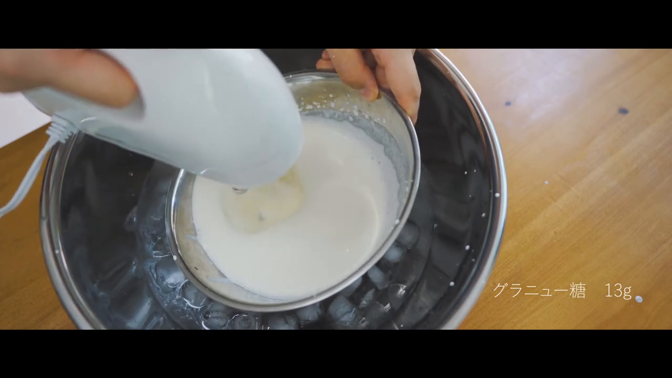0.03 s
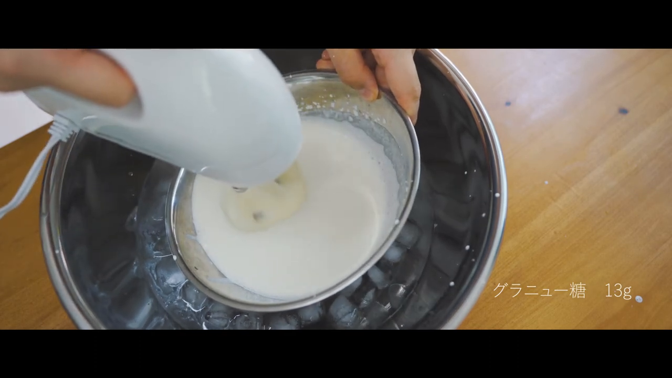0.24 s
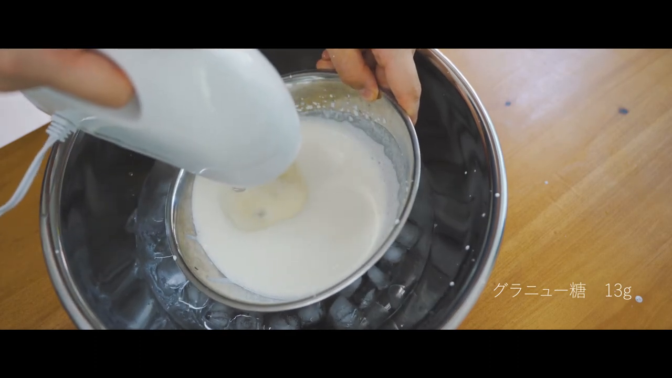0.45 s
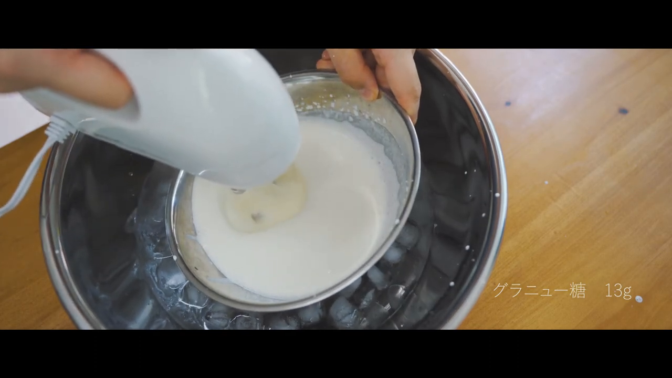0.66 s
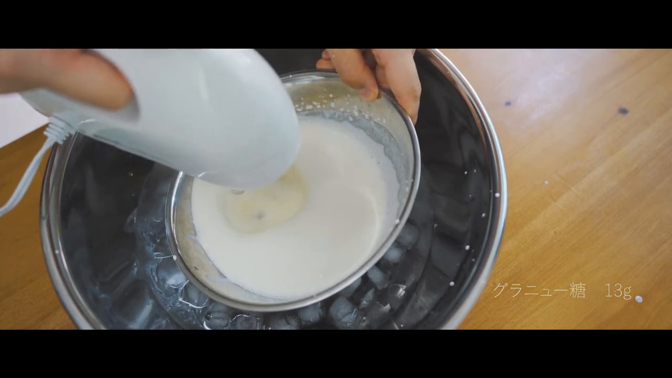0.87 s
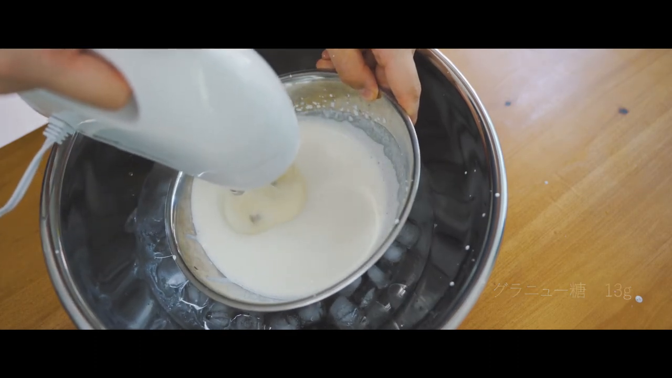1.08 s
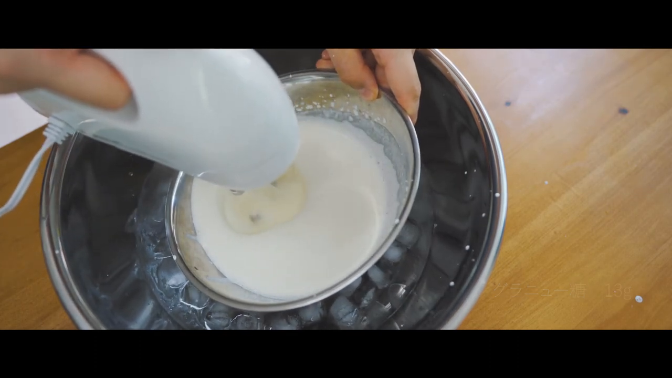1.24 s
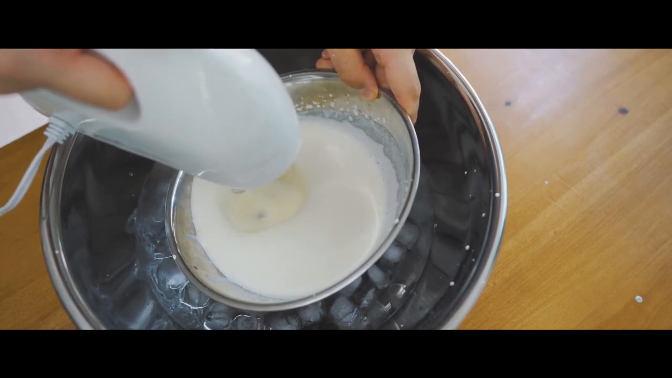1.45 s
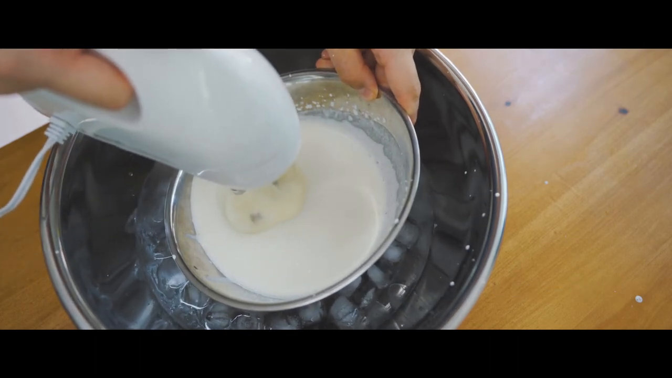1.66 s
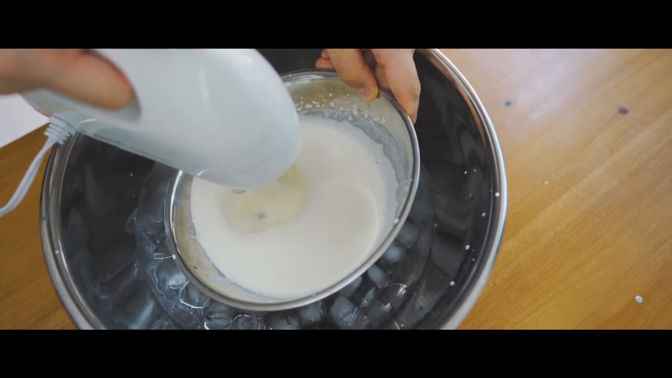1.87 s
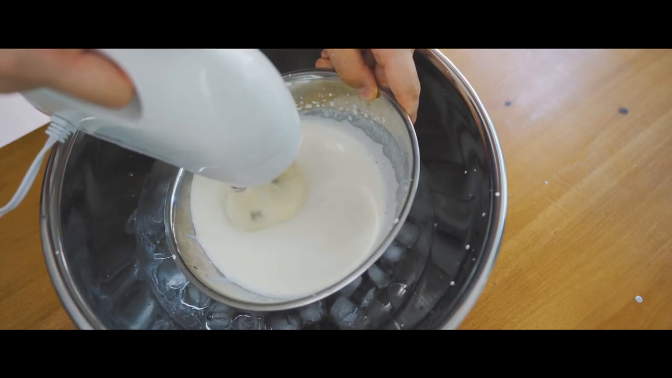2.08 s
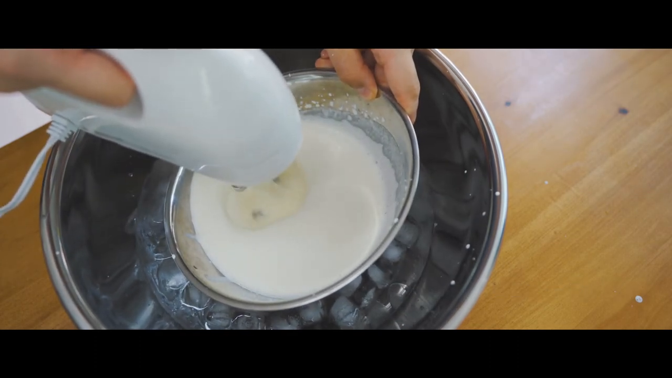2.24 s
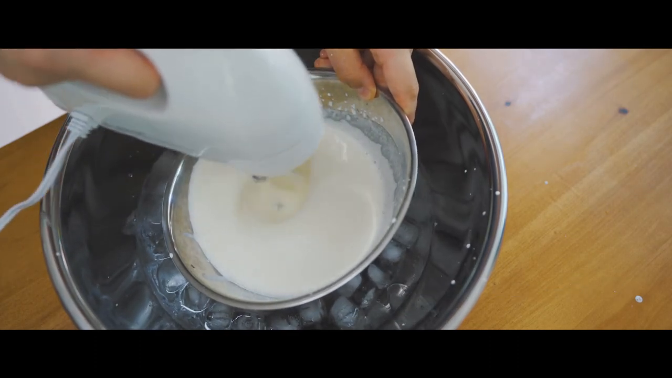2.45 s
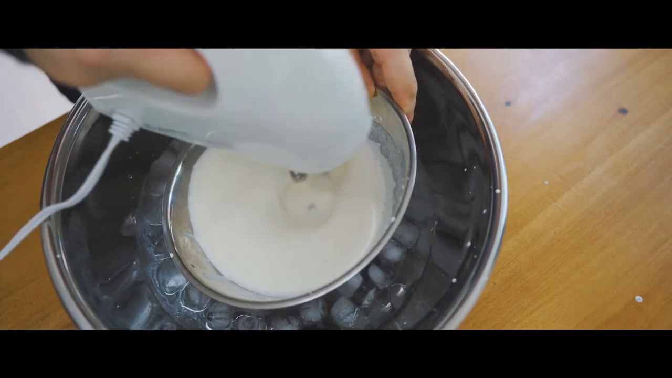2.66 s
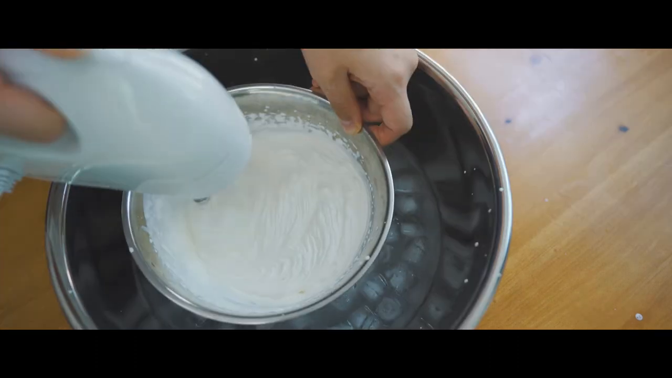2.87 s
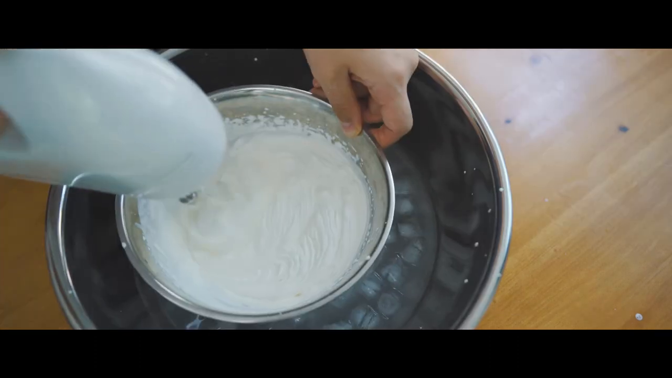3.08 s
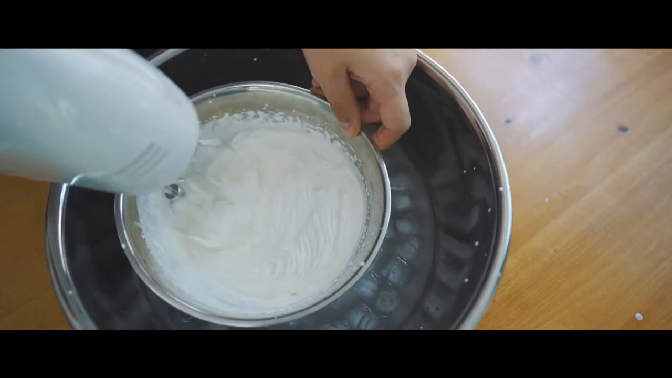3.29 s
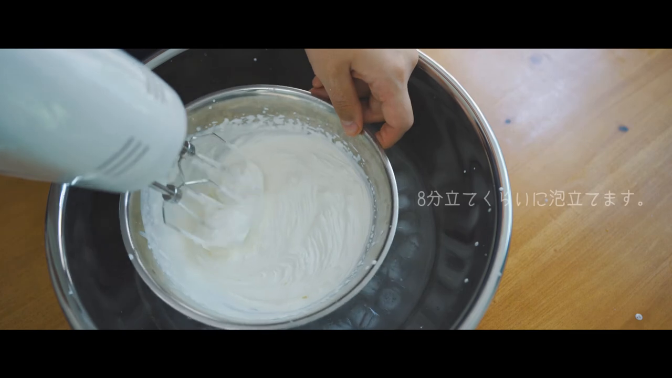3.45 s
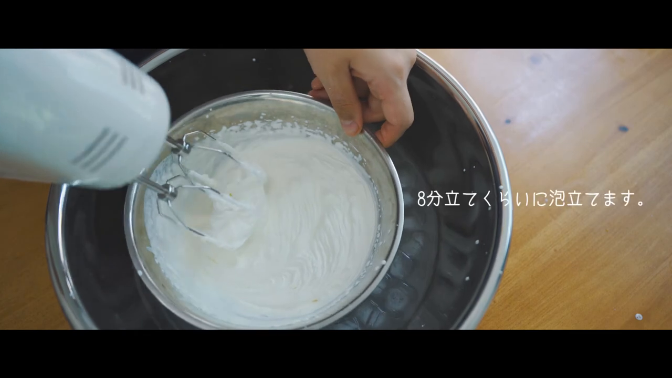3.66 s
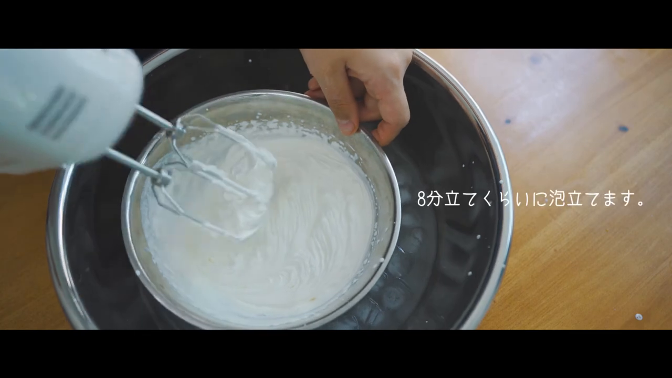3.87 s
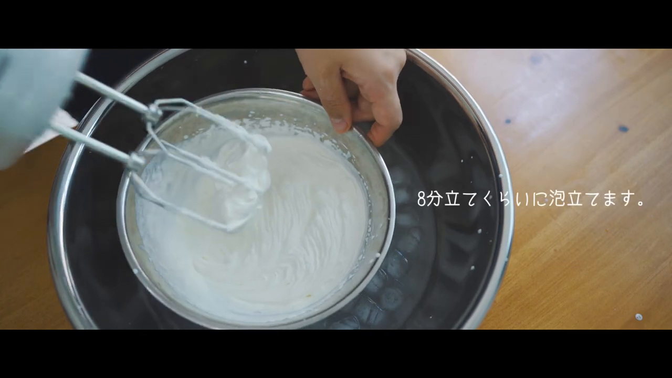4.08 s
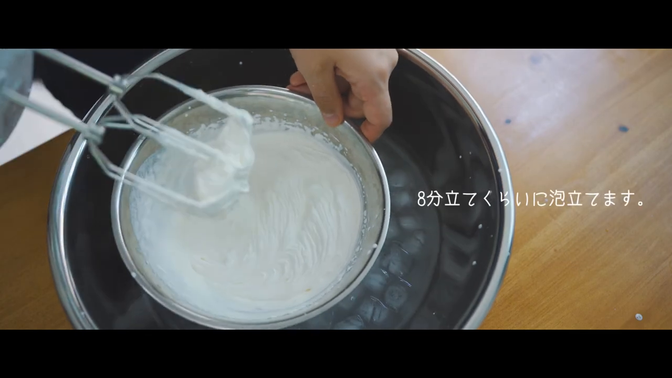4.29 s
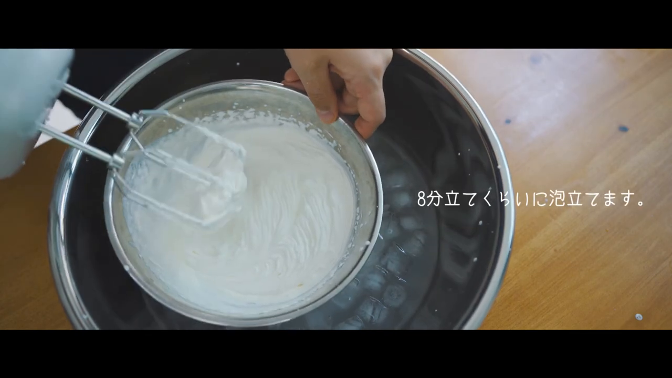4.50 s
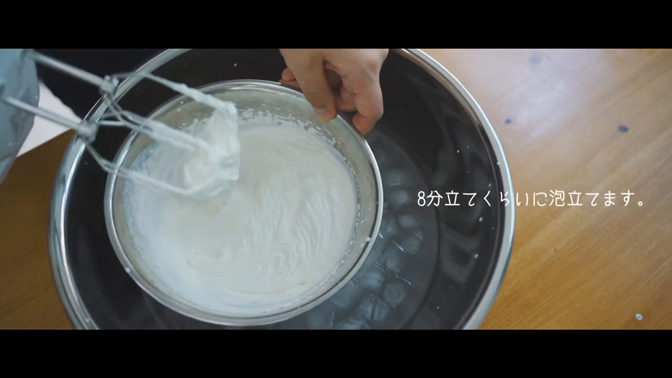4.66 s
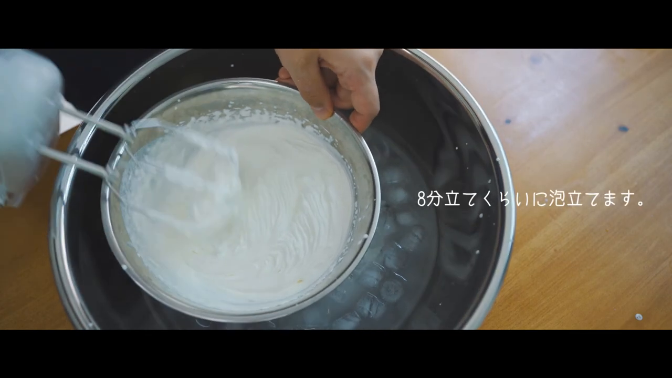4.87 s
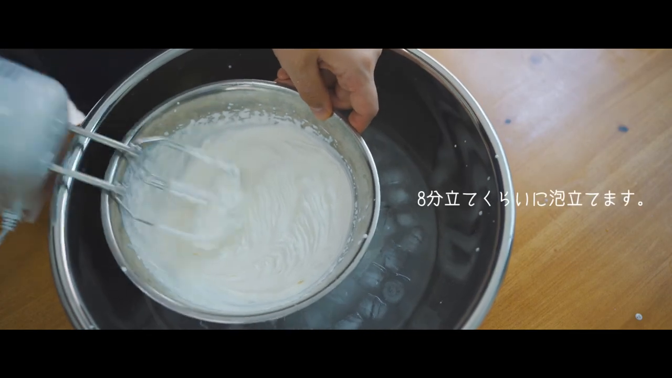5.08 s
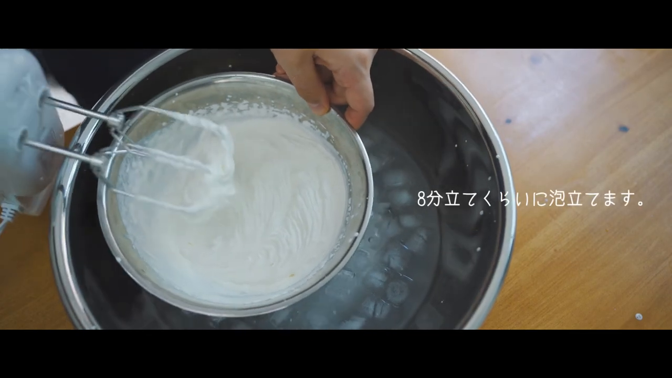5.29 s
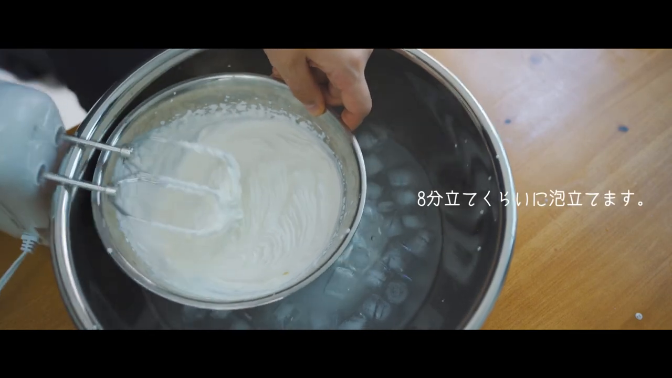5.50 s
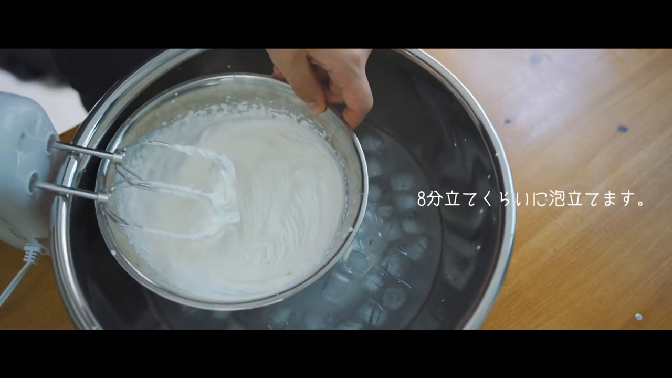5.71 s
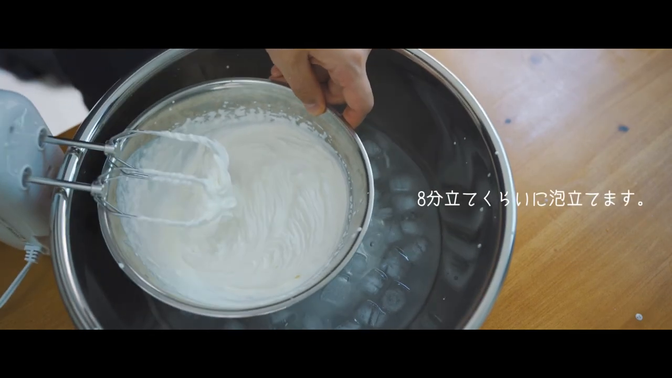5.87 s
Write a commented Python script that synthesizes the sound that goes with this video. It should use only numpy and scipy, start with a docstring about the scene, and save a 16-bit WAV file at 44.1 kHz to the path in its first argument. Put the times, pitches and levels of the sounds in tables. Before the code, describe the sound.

An electric hand mixer whips cream in a bowl, its motor whining steadily above a wet patter and gear rattle. After roughly three seconds it clicks off and spins down. Scattered light ticks and taps of the beaters follow, with a little dripping cream, then sharper knocks on glass and a short buzzing clang on a steel bowl. The sound is close, in a quiet kitchen with little echo.

```python
"""Whipping cream with a hand mixer

An electric mixer whips cream in a glass bowl that stands in a steel bowl of ice water. Its motor
whines and throbs with the mains over rattling gears and churning cream, then is switched off and coasts.
The lifted beaters tick in their sockets, drop cream and knock on the glass; the steel bowl rings."""
import sys
import numpy as np
from scipy import signal
from scipy.fft import rfft, irfft, next_fast_len
from scipy.io import wavfile

SR = 44100
rng = np.random.default_rng(int(sys.argv[2]) if len(sys.argv) > 2 else 0)


def dump(signal):
    """Clip the signal to [-1, 1] and save it as 16-bit WAV at the path in sys.argv[1]."""
    limited = np.clip(np.atleast_2d(signal).T, -1, 1)
    pcm = np.round(limited * 32767).astype(np.int16)
    wavfile.write(sys.argv[1], SR, pcm)


N = 261954
TIME = np.arange(N) / SR
OFF_S, MAINS_HZ = 2.87, 50  # when the whine cuts off; pitch of the mains power
TOP_SPEED, BAR_COUNT = 242.5, 12  # motor turns per second with no load; contact bars on the rotor

# Table levels are relative: the functions add their own gains. A ring time is the time to fade by 60 dB.
# motor speed lost to the thickening cream (time [s], loss [turns/s])
CREAM_DRAG = [(0, .1), (1.1, .4), (1.8, 1.9), (2.5, 2.5), (2.86, 1.6)]
# how hard the beaters work (time [s], level [dB])
LOAD = [(0.0, -28.5), (0.01, -30.5), (0.48, -36), (0.51, -33.5), (0.77, -37.5), (1.6, -36.5), (2.27, -38),
        (2.86, -34.5)]
# lowest tone of the whine (time [s], level [dB])
WHINE_LEVEL = [(0.0, -32), (0.17, -35.5), (0.4, -31), (0.64, -32.5), (0.68, -30), (2.55, -29.5),
               (2.76, -36.5), (2.79, -31), (2.86, -32.5)]
# how loud the whine's upper tones are (time [s], level of tones 2 to 4 [dB], level of tone 5 [dB])
WHINE_OVERTONE_LEVELS = [(0.0, -53, -52), (0.25, -44, -53), (0.79, -46.5, -59), (1.26, -42, -66),
                         (1.42, -40.5, -56), (2.17, -48.5, -62), (2.5, -45, -55), (2.6, -39.5, -58),
                         (2.86, -49.5, -50)]
# the whine's five tones (level [dB], left minus right [dB], left side's lead [rad], mains throb [0-1])
WHINE_TONES = [(3, .5, 1.12, 0.55), (-4.5, -4.5, 1.38, 0.52), (-10.5, -6.5, 0.61, 0.16), (-17, -2, .2, 0.1),
               (1.5, 0, 1.5, 0.1)]
# shaking of the unbalanced rotor and chatter of the brushes (multiple of motor speed [x], level [dB])
ROTOR_TONES = [(1, -59.5), (3, -56), (5, -64), (7, -57), (8, -49.5), (11, -49), (13, -53), (17, -58.5)]
BRUSH_TONES = [(51, -65), (53, -66), (54, -67), (57, -67), (61, -67)]
# hum of the motor's fixed coils (multiple of the mains [x], level [dB])
COIL_TONES = [(6, -64.5), (10, -62), (12, -45), (24, -55.5)]
# tone colours of the brushes with and without power, and of the gears (frequency [Hz], level [dB])
RASP_COLOUR = [(2500, -35), (2780, 0.5), (2930, -0.5), (3030, -4), (3250, -36.5)]
SLIDE_COLOUR = [(600, -56), (1500, -42), (2000, -41), (2400, -53), (3800, -49), (7000, -56), (8300, -51),
                (9500, -62), (12500, -55), (14000, -53), (16000, -60)]
GEAR_COLOUR = [(500, -25), (900, -8.5), (1200, -4.5), (1380, -9), (1600, -3), (1950, -0.5), (2180, -1),
               (2330, -9.5), (2500, 2), (2720, -10), (2930, -7), (3150, -10.5), (3700, -22), (6000, -31.5)]
# tone colours of churned, spraying and slapped cream (frequency [Hz], level [dB])
CHURN_COLOUR = [(30, -34), (70, -23), (130, -12), (180, -11), (250, 3.5), (330, 0.5), (450, 2), (560, 6),
                (640, 11.5), (760, -0.5), (1000, -4.5), (1600, -17.5)]
SPRAY_COLOUR = [(2000, -45), (3300, 1), (4200, 6), (5000, 2), (5800, 3.5), (7200, -2), (8500, 0),
                (10500, -6.5), (12000, -21), (14500, -31), (16000, -48)]
SLAP_COLOUR = [(60, -32), (220, 2), (380, 0), (620, -5), (3000, -60)]
# how hard the beaters slap the cream (time [s], level [dB])
SLAP_LEVEL = [(0, -31), (.3, -36), (.6, -30), (.85, -38), (1.45, -34), (1.8, -38), (2.1, -35), (2.6, -47)]
# switch, beaters and bowls knocking (time [s], clack [dB], thud [dB], wires [dB], shafts [dB])
KNOCK_HITS = [(2.893, -18, -30.5, -41.5, -26), (3.3925, -29.5, -58, -74, -37), (3.443, -36, -44, -71, -54),
              (3.4815, -30, -62, -50.5, -42), (3.529, -39, -58, -57, -41.5), (3.64, -33.5, -49, -53, -53),
              (3.752, -42.5, -57, -74, -56), (3.858, -43, -45, -61, -57), (3.921, -38, -49, -59, -56),
              (4.006, -45, -48.5, -61, -51), (4.035, -39, -47.5, -50.5, -43),
              (4.0846, -32.5, -47, -56, -30.5), (4.123, -44, -58, -57, -40), (4.207, -40, -55, -72, -50),
              (4.237, -44, -51, -66, -50), (4.2825, -44, -42.5, -74, -42), (4.3328, -31, -41.5, -47.5, -31),
              (4.383, -21, -41.5, -36.5, -21.5), (4.3918, -21, -50, -43, -21),
              (4.3961, -31, -40, -38.5, -20.5), (4.414, -35, -40.5, -41.5, -23.5),
              (4.426, -28, -50, -60, -30), (4.440, -27, -55, -48, -31.5), (4.480, -35, -38, -57, -36.5),
              (4.4898, -28, -47, -54, -34.5), (4.5218, -40, -44, -66, -47), (4.539, -36, -47.5, -60, -38),
              (4.579, -42, -56, -60, -42), (4.6232, -43, -42.5, -59, -43), (4.646, -45, -67, -51.5, -38),
              (4.704, -54, -42.5, -65, -61), (4.803, -48, -50.5, -74, -38.5),
              (4.8318, -38, -42.5, -52, -34.5), (4.861, -47, -44, -55.5, -50), (4.9522, -31, -51, -64, -38),
              (4.9637, -32, -43.5, -63, -33.5), (5.018, -46, -46.5, -54, -48),
              (5.1154, -19, -29, -32.5, -32), (5.1515, -35, -32.5, -34.5, -32),
              (5.2597, -35, -38.5, -46.5, -45), (5.299, -22.5, -48, -36.5, -36),
              (5.3244, -23.5, -44, -39, -37), (5.3338, -21, -45, -45, -36), (5.345, -30, -36, -47, -31.5),
              (5.3775, -32, -35, -62, -40), (5.3966, -28, -35, -48, -28.5), (5.4493, -32, -36, -50, -40),
              (5.6152, -21, -27.5, -41, -49), (5.7723, -31, -45, -68, -35.5), (5.801, -35, -38, -52.5, -45),
              (5.896, -37, -46, -68, -44), (5.915, -39, -48, -71, -41)]
# the mixer landing on the steel rim (time [s], clack [dB], thud [dB], shimmer [dB], ring time [s])
STEEL_HITS = [(5.473, -33.5, -34.5, -31.5, 0.62), (5.616, -43, -33, -31.5, 0.22)]
# beaters hitting the glass rim (time [s], level [dB])
GLASS_TAPS = [(5.116, -34.5), (5.153, -32), (5.326, -55), (5.380, -49)]
# a wire scraping the glass (start [s], length [s], level [dB], squeal pitch [Hz], squeal level [dB])
GLASS_SCRAPES = [(2.733, 0.16, -52, 2070, -39.5), (5.105, 0.2, -36, 2490, -45),
                 (5.298, 0.14, -51, 5700, -51)]
# tone colours of the parts of a knock, a clang and a scrape (frequency [Hz], level [dB])
CLACK_COLOUR = [(500, -16), (1000, -43), (1500, -6.5), (1950, -10), (2400, 1), (2800, -4), (3300, -5),
                (4000, -22), (6000, -42)]
THUD_COLOUR = [(40, -34), (110, -48), (200, -2.5), (400, -3.5), (700, 2), (1100, 0), (1800, -1),
               (4000, -61)]
TICK_COLOUR = [(2500, -37), (4200, 8), (7000, -1), (10000, -14), (16000, -13)]
WIRE_COLOUR = [(3000, 7.5), (4200, -4), (5500, 6), (6800, -3.5), (8300, -3.5), (10000, -14), (13000, -24)]
SHIMMER_COLOUR = [(2500, -18), (4200, 2.5), (5500, 5.5), (6800, 2.5), (8300, -4.5), (10000, -11),
                  (13000, -28), (16000, -25)]
SCRAPE_COLOUR = [(500, -15), (1200, 3), (3000, 1), (9000, -10), (16000, -40)]
# notes of the shafts, the glass, the steel and the bowls' low hum (pitch [Hz], level [dB], ring time [s])
SHAFT_NOTES = [(1650, -17, .04), (2310, -1, .026), (2520, 0, .026), (2412, -16, .12), (2850, -10, .02),
               (3133, -15, .06)]
GLASS_NOTES = [(820, -14, 0.052), (1275, 2, 0.2), (1320, -6, 0.19), (1975, -4, 0.19), (2186, -3, 0.14),
               (2880, -5, .06), (3330, -1, 0.11), (3450, -3, .1), (4200, -7, 0.18), (4530, -7, .18),
               (4690, -6, 0.2), (7040, -11, .09), (8160, -9, 0.17), (8330, -11, .12)]
STEEL_NOTES = [(118.4, -16, 1.6), (165, -15, 0.66), (226, -13, 0.85), (258.4, -15, 1.8), (511.4, -16, 1.8),
               (874, -10, 1.0), (1483, -11.5, 1.6), (1544, -6, 0.5), (1667, -3, 0.42), (1935, -10, 0.9),
               (1981, -20, 1.8), (2239, -14, 1.5), (2506, 0, .42), (2616, -8, 0.7), (2950, -10, 1.4),
               (3211, -7, 0.5), (3451, -13, 1.8), (3644, -20, 1.6), (3817, -21, 1.6), (3897, -6, 0.4),
               (3973, -25, 1.8), (4129, -15, 1.7), (4285, -26, 1.6), (5383, -26, 1.2), (5857, -23, 1.1),
               (6374, -25, 1.1), (4441, -24, 1.7), (4531, -1, 0.42), (4608, -22, 1.7), (4786, -12, 0.85),
               (4974, -24, 1.6), (5091, 0, .42), (5219, -11, .55), (5784, -10, .4), (6110, -24, 1.0),
               (6971, -11, 0.35)]
LOW_BOWL_NOTES = [(183, -60, 1.6), (367.7, -56.5, 2.8)]
# cream dropping into the bowl (time [s], level [dB], starting pitch [Hz])
CREAM_DROPS = [(2.68, -33, 384), (2.735, -46, 262), (2.846, -36.5, 280), (2.879, -39.5, 266),
               (4.331, -44.5, 554), (4.396, -41.5, 407), (4.438, -49, 293), (4.859, -41, 527.5),
               (5.336, -43, 364)]
# tone colours of the shaken table and of the room's air (frequency [Hz], level [dB])
RUMBLE_COLOUR = [(25, -20), (60, -2.5), (110, -14), (170, 0), (300, -3.5), (600, -6.5), (1200, -5),
                 (2500, -5), (5000, -32)]
BOOM_COLOUR = [(25, -5), (60, 0), (110, 6), (170, 2), (300, -8), (600, -24), (1200, -3), (3000, -38)]
AIR_COLOUR = [(15, -41), (25, -1), (140, -8), (179, 4), (228, -5.5), (268, 4.5), (324, -7), (541, -9.5),
              (927, -12.5), (1510, -19), (2140, -22), (3040, -14.5), (4430, -17), (15700, -29.5)]
# an appliance humming in the kitchen (pitch [Hz], level [dB])
APPLIANCE_TONES = [(113, -70.5), (183, -73.5), (275, -79), (367, -69.5), (546, -74.5)]
# the part of a sound that the bowls scatter to the sides (frequency [Hz], share of the whole [dB])
SCATTER_SHARE = [(60, -15), (130, -9), (500, -9), (1000, -5.5), (2200, -5), (4000, -2), (8000, -1),
                 (16000, -1.5)]


def mixer():
    """The motor whines and hums, while cream and gears surge with each turn of the beaters."""
    speed = motor_speed()
    angle = 2 * np.pi * np.cumsum(speed) / SR
    mains = 2 * np.pi * MAINS_HZ * TIME
    powered = np.clip((OFF_S - TIME) / .005 + 1, 0, 1)
    beater_angle = angle / 20  # the gears turn the beaters 20 times slower
    surge_db = 1.9 * np.sin(beater_angle) + 1.3 * np.sin(2 * beater_angle) + .5 * drift(40)
    throb_db = .21 * powered * np.cos(2 * mains)
    slaps = cream_slaps(beater_angle, powered)
    churn = cream_churn(speed, surge_db)
    gears = gear_rattle(speed, .022 * surge_db + throb_db)
    spray = cream_spray(speed, .5 * surge_db + throb_db)
    rasp = brush_rasp(speed)
    whine = motor_whine(angle, mains)
    hum = motor_hum(angle, mains)
    slide = sliding_brushes(angle, speed)
    return slaps + churn + gears + spray + powered * (whine + rasp + stereo(hum)) + stereo(slide)


def motor_speed(low_speed=220.5, step_s=.11, settle_s=.29, coast_speed=190, coast_s=1.29):
    """Turns per second: the motor steps up and sags in the cream; later it coasts to a stop."""
    settling = np.exp(-np.maximum(TIME - step_s, 0) / settle_s)
    driven = TOP_SPEED - (TOP_SPEED - low_speed) * settling - curves(CREAM_DRAG)[0]
    brake = 170.5 * coast_s  # rubbing alone takes away 170.5 turns/s every second
    air_drag = np.exp(-np.maximum(TIME - OFF_S, 0) / coast_s)
    coasting = np.maximum((coast_speed + brake) * air_drag - brake, 1)
    return np.where(TIME < OFF_S, driven, coasting)  # the sound jumps to a slower motor


def motor_whine(angle, mains):
    """Contact bars whizz past the brushes; the current swells and tugs the rotor twice a mains cycle."""
    bars = BAR_COUNT * angle + .035 * drift(45.2)
    bars += .2 * drift(24)  # the cream catches the beaters unevenly
    tug = .16 * np.sin(2 * mains)
    lowest_db, = curves(WHINE_LEVEL)
    middle_db, top_db = curves(WHINE_OVERTONE_LEVELS)
    levels = [lowest_db, middle_db, middle_db, middle_db, top_db]
    out, sides = np.zeros((2, N)), np.array([[.5], [-.5]])
    for k, (level_db, (db, pan_db, lead, throb)) in enumerate(zip(levels, WHINE_TONES), start=1):
        waver_db = .8 * np.sqrt(k) * drift(14)
        gain = from_db(level_db + db + pan_db * sides + waver_db)
        out += gain * (1 + throb * np.cos(2 * mains)) * sine(k * bars - tug + lead * sides)
    return out


def motor_hum(angle, mains):
    """The unbalanced rotor, chattering brushes and coils each add a row of fluttering tones."""
    parts = [(angle, ROTOR_TONES, .16), (angle, BRUSH_TONES, .25), (mains, COIL_TONES, .36)]
    out = np.zeros(N)
    for phase, tones, flutter in parts:
        for multiple, db in tones:
            gain = from_db(db) * (1 + flutter * drift(25.57))
            out += gain * sine(multiple * phase + flutter * drift(25.37) + rng.uniform(0, 2 * np.pi))
    return out


def brush_rasp(speed):
    """The powered brushes add a narrow band of noise around the whine."""
    db = -39 + effort_db(speed, load_share=1, slowing_db=9, release_db=4)
    return from_db(db) * noise(RASP_COLOUR)


def sliding_brushes(angle, speed):
    """With the power off the brushes only rub the bars: faint falling tones, the higher ones blurred."""
    coasting, out = (TIME > OFF_S) & (speed > 1), np.zeros(N)
    for k in range(1, 16):
        blur = .62 * np.sqrt(k) * drift(450)[coasting]
        flutter = from_db(3.5 * drift(28)[coasting] - 2)
        gain = gain_at(SLIDE_COLOUR, k * BAR_COUNT * speed[coasting])
        out[coasting] += flutter * gain * sine(k * BAR_COUNT * angle[coasting] + blur)
    return .9 * (speed / TOP_SPEED) ** 1.3 * out


def gear_rattle(speed, swing_db):
    """Thousands of tiny gear clicks a second blend into a rattle."""
    db = -35.5 + effort_db(speed, load_share=1, slowing_db=9, release_db=4) + swing_db
    return from_db(db) * coloured(clicks(per_s=4000, spread_db=2), GEAR_COLOUR)


def cream_churn(speed, swing_db):
    """Stirred cream makes a low, thick patter."""
    db = -44.5 + effort_db(speed, load_share=.73, slowing_db=5.5, release_db=4.5) + swing_db
    return from_db(db) * coloured(clicks(per_s=1200, spread_db=0), CHURN_COLOUR)


def cream_spray(speed, swing_db):
    """Fine spray makes a bright hiss of very uneven clicks."""
    db = -44 + effort_db(speed, load_share=.77, slowing_db=7.5, release_db=3.5) + swing_db
    return from_db(db) * coloured(clicks(per_s=9000, spread_db=7.5), SPRAY_COLOUR)


def cream_slaps(beater_angle, powered):
    """The beaters slap the cream once a turn while the power is on."""
    turn_count = np.floor(beater_angle / (2 * np.pi) - .17)
    at = np.flatnonzero(np.diff(turn_count) * powered[1:])
    db = curves(SLAP_LEVEL)[0][at] + rng.normal(-2.5, 1.2, len(at))
    return fading(TIME[at], db, ring_s=.12, rise_s=.004) * noise(SLAP_COLOUR)


def effort_db(speed, load_share, slowing_db, release_db):
    """A part gets louder with load; it loses slowing_db at half speed and release_db when coasting."""
    load_db, = curves(LOAD)
    extra_load_db = load_db - load_db[TIME < OFF_S].mean()
    released = np.clip((TIME - OFF_S) / .11, 0, 1)
    return load_share * extra_load_db + slowing_db * np.log2(speed / TOP_SPEED) - release_db * released


def knocks():
    """Each knock is a dry clack, a thud of the bowls, a metal tick, and ringing wires and shafts."""
    times, clack_db, thud_db, wire_db, shaft_db = np.transpose(KNOCK_HITS)
    clack = noise(CLACK_COLOUR) * fading(times, clack_db - 4.5, ring_s=.024, rise_s=.00073)
    thud = noise(THUD_COLOUR) * fading(times, thud_db - .5, ring_s=.05, rise_s=.00054)
    tick = noise(TICK_COLOUR) * fading(times, wire_db + 5, ring_s=.024, rise_s=.0001)
    return clack + thud + tick + wire_zing(times, wire_db + .5) + stereo(shafts(times, shaft_db - 3.5))


def wire_zing(times, levels_db, count=120, ring_s=.15):
    """The beater wires ring with many close notes, mixed anew for each knock and each side."""
    hz = np.linspace(WIRE_COLOUR[0][0], WIRE_COLOUR[-1][0], count) + 30 * rng.standard_normal(count)
    gain, age = gain_at(WIRE_COLOUR, hz), TIME[:SR // 4]
    notes = gain[:, None] / np.linalg.norm(gain) * np.exp(2j * np.pi * hz[:, None] * age)
    notes *= decay(age, ring_s)
    out = np.zeros((2, N))
    for s, db in zip(times, levels_db):
        real, imaginary = rng.standard_normal((2, 2, count))  # random strength and phase for each note
        add_at(out, s, from_db(db) * ((real + 1j * imaginary) @ notes).real)
    return out


def shafts(times, levels_db):
    """The shafts ring in their sockets: a firm knock seats them and rings true, a faint one off pitch."""
    hz, db, ring_s = np.transpose(SHAFT_NOTES)[:, :, None]
    age, out = TIME[:SR // 6], np.zeros(N)
    signs = (-1) ** np.arange(len(SHAFT_NOTES))[:, None]  # neighbouring notes swing opposite ways
    looseness = (levels_db.max() - levels_db) / np.ptp(levels_db)
    detunes = np.exp(.2 * looseness * rng.standard_normal(len(times)))
    for s, hit_db, detune in zip(times, levels_db, detunes):
        notes = signs * from_db(hit_db + db) * decay(age, ring_s) * np.sin(2 * np.pi * hz * detune * age)
        add_at(out, s, notes.sum(axis=0))
    return out


def rim_buzz():
    """The mixer lands on the steel rim and buzzes against it, feeding the bowl's strongest notes."""
    times, clack_db, thud_db, shimmer_db, ring_s = np.transpose(STEEL_HITS)
    clack = noise(CLACK_COLOUR) * fading(times, clack_db - 4, ring_s, rise_s=.002)
    thud = noise(THUD_COLOUR) * fading(times, thud_db - .5, ring_s, rise_s=.002)
    shimmer = noise(SHIMMER_COLOUR) * fading(times, shimmer_db + 3, ring_s, rise_s=.002)
    chatter = rng.standard_normal((2, N))
    notes = sum(from_db(db) * unit_level(resonance(chatter, hz, width_hz=18))
                for hz, db, _ in STEEL_NOTES if db >= -6)
    return clack + thud + shimmer + unit_level(notes) * fading(times, shimmer_db + 2, ring_s, rise_s=.025)


def steel_bowl():
    """The wide steel bowl rings, sending each note to the two sides with different strength."""
    return np.array([ring(STEEL_HITS, STEEL_NOTES, uneven_db=1.5) for side in range(2)])


def glass_bowl():
    """The beaters tap the glass rim, which rings briefly."""
    return from_db(-1.5) * stereo(ring(GLASS_TAPS, GLASS_NOTES, uneven_db=2))


def glass_scrape():
    """A wire sticks and slips along the rim, squeals and keeps the glass ringing roughly."""
    grip = from_db(2.5 * drift(90)) * coloured(clicks(per_s=2200, spread_db=-6), SCRAPE_COLOUR)
    slips, squeal = np.zeros((2, 2, N))
    for start, length, db, hz, squeal_db in GLASS_SCRAPES:
        stroke = np.sin(np.pi * np.clip((TIME - start) / length, 0, 1))
        slips += from_db(db) * stroke * grip
        squeal += from_db(squeal_db) * stroke * unit_level(resonance(grip, hz, width_hz=.04 * hz))
    glass = sum(from_db(db) * resonance(slips, hz, width_hz=hz / 70) for hz, db, _ in GLASS_NOTES)
    return from_db(-7) * slips + glass + squeal


def cream_plops(sink_s=.0166):
    """A blob lands in thick cream: a dull, ragged note that sinks as the hollow opens."""
    out, ragged = np.zeros(N), .75 * drift(280)
    for s, db, start_hz in CREAM_DROPS:
        hz = start_hz * (.49 + .51 * np.exp(-np.maximum(TIME - s, 0) / sink_s))
        out += fading([s], [db], ring_s=.16, rise_s=.0017) * sine(2 * np.pi * np.cumsum(hz) / SR + ragged)
    return out


def cream_smacks(from_s=3.3, to_s=5.1, per_s=34, low_hz=900, high_hz=3400):
    """Tiny air pockets open in the cream on the lifted beaters, each a faint tick with its own pitch."""
    out, span = np.zeros(N), to_s - from_s
    age = TIME[:SR // 20]
    for when, size, pitch in rng.random((int(per_s * span), 3)):
        hz = low_hz * (high_hz / low_hz) ** np.sqrt(pitch)
        tick = decay(age, ring_s=11 / hz) * np.sin(2 * np.pi * hz * age)
        add_at(out, from_s + when * span, from_db(-51 + 7 * size ** 2) * tick)
    return out


def table_rumble():
    """The table rumbles after each knock and booms when the steel bowl is hit."""
    times, _, thud_db, *_ = np.transpose(KNOCK_HITS)
    rumble = noise(RUMBLE_COLOUR) * fading(times, thud_db - 11, ring_s=.6, rise_s=.0066)
    times, _, thud_db, *_ = np.transpose(STEEL_HITS)
    boom = noise(BOOM_COLOUR) * fading(times, thud_db - 9, ring_s=.75, rise_s=.014)
    return rumble + boom


def bowl_hum():
    """The bowls hum while the motor shakes them and ring on after it is switched off."""
    since_off, out = np.maximum(TIME - OFF_S, 0), np.zeros(N)
    for hz, db, ring_s in LOW_BOWL_NOTES:
        wobble = drift(8) * np.exp(-4 * since_off)
        out += from_db(db) * decay(since_off, ring_s) * sine(2 * np.pi * hz * TIME + wobble)
    return stereo(out)


def kitchen_echo(x, echo_db=-15, ring_s=.22):
    """The room adds a short tail of echoes, different on each side."""
    age = TIME[:SR // 2]
    echoes = rng.standard_normal((2, len(age))) * decay(age, ring_s) * (1 - np.exp(-age / .005))
    echoes /= np.sqrt(np.sum(echoes ** 2) / 2)
    return x + from_db(echo_db) * signal.fftconvolve(echoes, x, axes=1)[:, :N]


def background():
    """Still air, a faint hiss and a softly wavering appliance hum."""
    air = from_db(-58) * noise(AIR_COLOUR)
    hiss = from_db(-82) * rng.standard_normal((2, N))
    hum = sum(from_db(db) * (1 + .15 * drift(3.45)) * sine(2 * np.pi * hz * TIME + .5 * drift(9.4))
              for hz, db in APPLIANCE_TONES)
    return air + hiss + hum


def ring(hits, notes, uneven_db):
    """Every hit sets each note ringing with its own strength; neighbouring notes swing opposite ways."""
    at = [round(hit[0] * SR) for hit in hits]
    hit_db, out = np.array(hits)[:, 1], np.zeros(N)
    for k, (hz, db, ring_s) in enumerate(notes):
        kicks = np.full(N, 1e-18)
        kicks[at] = from_db(hit_db + db + uneven_db * rng.standard_normal(len(at)))
        kept, step = decay(1 / SR, ring_s), 2 * np.pi * hz / SR  # fade and turn in one sample
        note = signal.lfilter([0, np.sin(step)], [1, -2 * kept * np.cos(step), kept ** 2], kicks)
        out += (-1) ** k * note
    return out


def fading(times, levels_db, ring_s, rise_s):
    """Loudness over time of blows that swell quickly and die away."""
    power = np.zeros(N)
    for s, db, length in zip(times, levels_db, np.broadcast_to(ring_s, len(times))):
        age = TIME[:min(SR, int(2 * length * SR))]
        blow = from_db(db) * (1 - np.exp(-age / rise_s)) * decay(age, length)
        add_at(power, s, blow ** 2)
    return np.sqrt(power)


def coloured(streams, colour):
    """Give three streams a tone colour and mix to stereo: one comes straight, one goes to each side."""
    size = next_fast_len(N)
    hz = np.fft.rfftfreq(size, 1 / SR)
    spectra = rfft(streams, size) * gain_at(colour, hz)
    share = gain_at(SCATTER_SHARE, hz)
    direct = irfft(spectra[0] * np.sqrt(1 - share ** 2), size)[:N]
    scattered = irfft(spectra[1:] * share, size)[:, :N]
    return unit_level(stereo(direct) + scattered)


def noise(colour):
    """Stereo noise with a tone colour."""
    return coloured(rng.standard_normal((3, N)), colour)


def clicks(per_s, spread_db):
    """Three streams of random clicks; spread_db makes their sizes uneven."""
    sizes = from_db(spread_db * np.minimum(rng.exponential(1, (3, N)), 4))
    return (rng.random((3, N)) < per_s / SR) * sizes * rng.choice([-1, 1], (3, N))


def stereo(x, lag_s=5.8e-5):
    """Sound from the bowl reaches the right side a little later."""
    size = next_fast_len(N + 64)
    delay = np.exp(-2j * np.pi * np.fft.rfftfreq(size, 1 / SR) * lag_s)
    return np.array([x, irfft(rfft(x, size) * delay, size)[:N]])


def resonance(x, hz, width_hz):
    """Keep a narrow band of a sound around one pitch."""
    return signal.lfilter(*signal.iirpeak(hz, hz / width_hz, fs=SR), x + 1e-18)


def drift(per_s):
    """A random wander of typical size 1 that changes course per_s times a second."""
    return unit_level(np.interp(TIME * per_s, np.arange(4000), rng.standard_normal(4000)))


def curves(table):
    """Join a table's points in time with straight lines, one curve for each value column."""
    times, *columns = np.transpose(table)
    return [np.interp(TIME, times, column) for column in columns]


def gain_at(colour, hz):
    """How strong a tone colour is at the given frequencies."""
    known_hz, db = np.transpose(colour)
    return from_db(np.interp(np.log(hz + 1e-3), np.log(known_hz), db))


def add_at(track, start_s, sound):
    """Add a short sound to a track, cutting off what runs past the end."""
    start = round(start_s * SR)
    track[..., start:start + sound.shape[-1]] += sound[..., :N - start]


def decay(age, ring_s):
    """A fade that loses 60 dB every ring_s seconds."""
    return from_db(-60 * age / ring_s)


def sine(phase):
    """A pure tone with an average power of 1."""
    return np.sqrt(2) * np.sin(phase)


def unit_level(x):
    """Scale a signal to an average power of 1."""
    return x / np.sqrt(np.mean(x ** 2) + 1e-20)


def from_db(db):
    """Turn decibels into a gain."""
    return 10 ** (np.asarray(db) / 20)


def scene():
    """The mixer runs and stops, then is lifted and rested on the bowls."""
    running = mixer() + bowl_hum()
    handling = knocks() + rim_buzz() + glass_bowl() + glass_scrape() + steel_bowl()
    cream = stereo(cream_plops() + cream_smacks())
    return running + kitchen_echo(handling + cream) + table_rumble() + background()


def record(dry, cutoff_hz=15850):
    """The highest treble is cut off steeply."""
    return signal.sosfilt(signal.ellip(12, .1, 80, cutoff_hz, fs=SR, output="sos"), dry)


dry = scene()
out = record(dry)
dump(out)
```